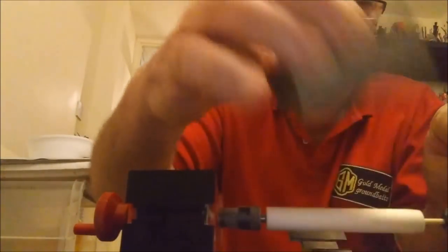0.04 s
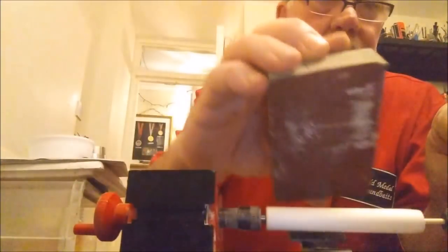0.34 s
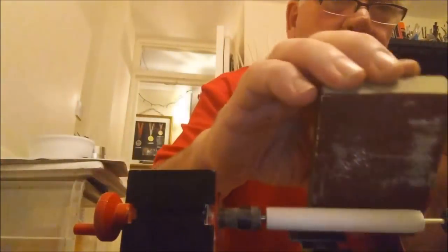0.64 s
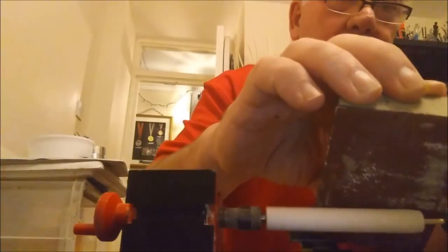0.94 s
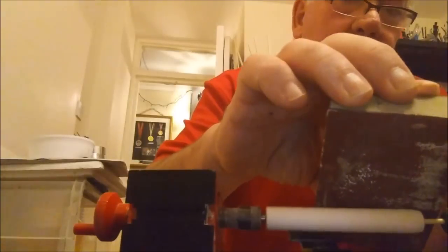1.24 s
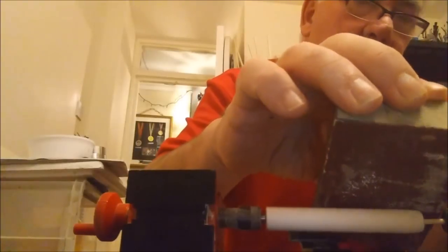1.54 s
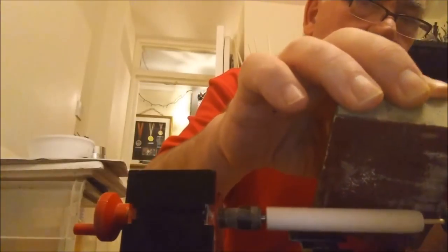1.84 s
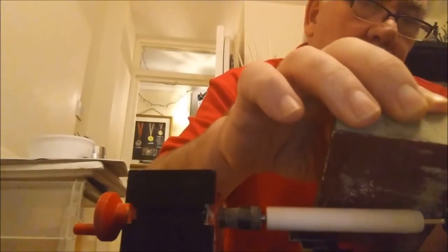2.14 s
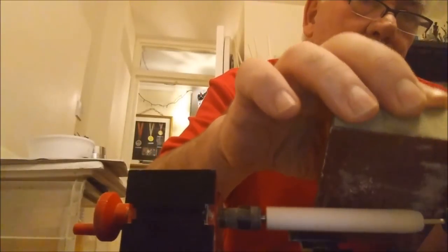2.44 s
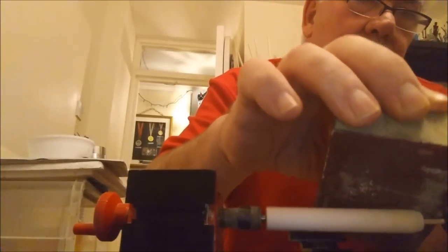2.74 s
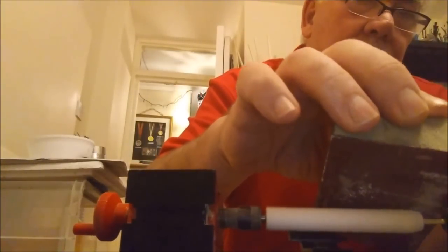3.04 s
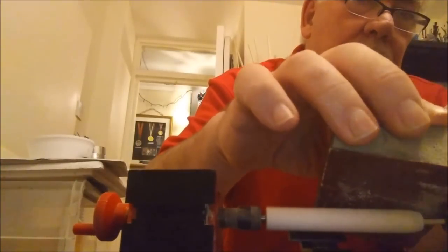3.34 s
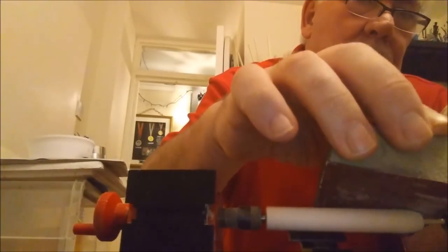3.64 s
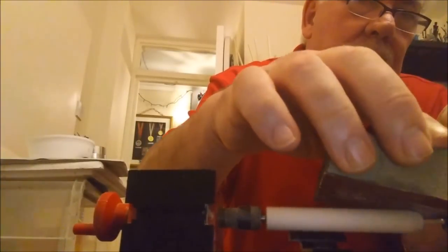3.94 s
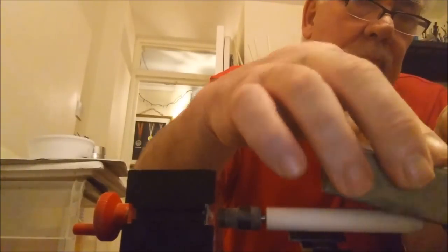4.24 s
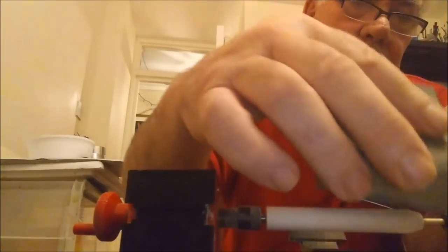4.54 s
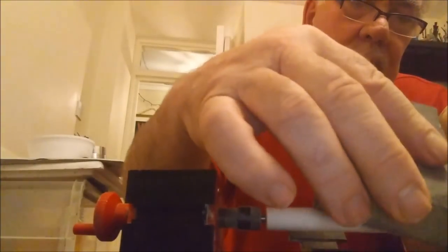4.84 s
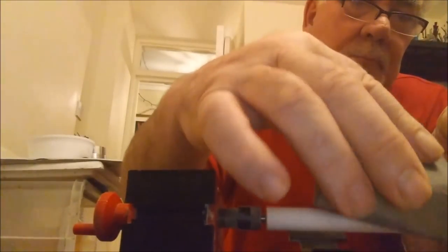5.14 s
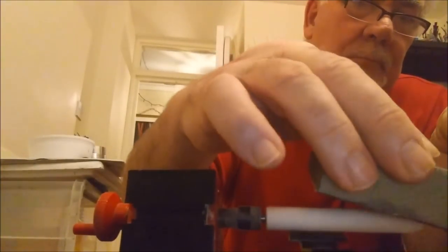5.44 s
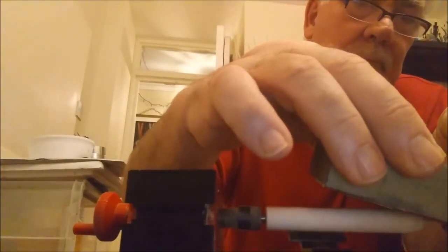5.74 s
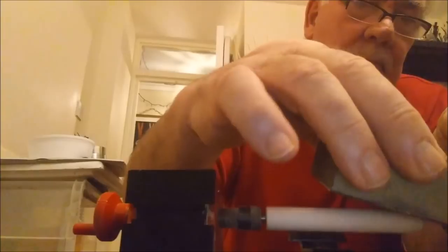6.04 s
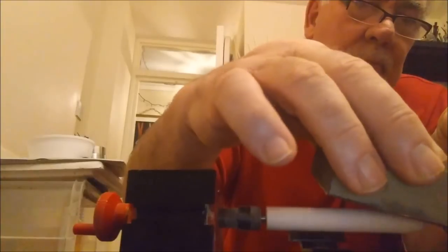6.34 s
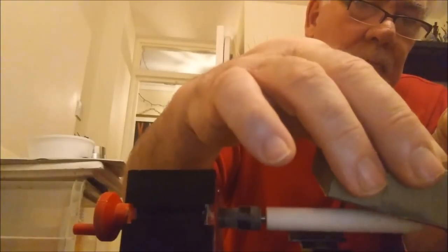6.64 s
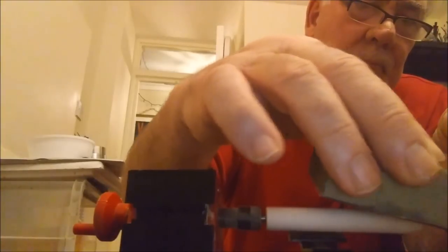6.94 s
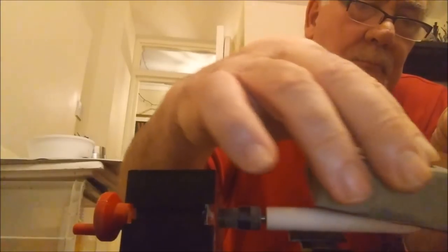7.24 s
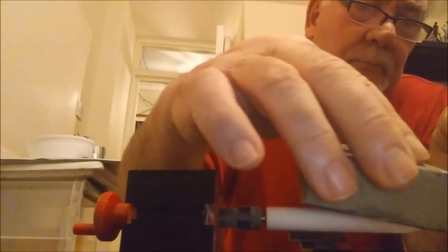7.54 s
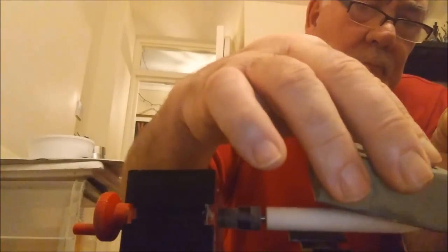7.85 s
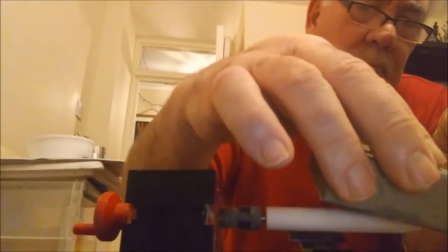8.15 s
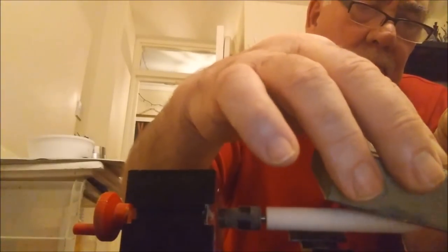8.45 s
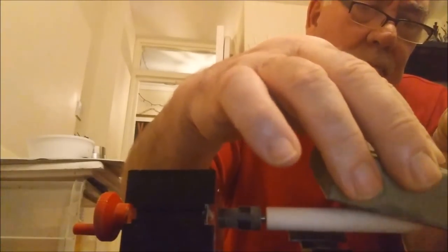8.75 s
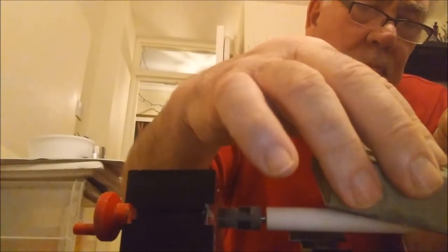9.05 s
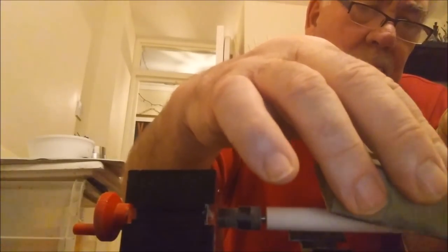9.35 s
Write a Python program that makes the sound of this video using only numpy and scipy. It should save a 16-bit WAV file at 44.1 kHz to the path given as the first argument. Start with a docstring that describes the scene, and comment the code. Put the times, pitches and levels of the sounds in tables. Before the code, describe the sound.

A small electric lathe whines steadily while a sanding block rasps against a spinning wooden rod, then a soft pad hisses more finely.

```python
"""A small electric lathe whines close by, in mono, its motor turning six times for each spindle turn.
At first the balsa rod runs loose and chatters. From about 1 s a sanding block steadies it: the grit
hisses and rasps as the slightly eccentric rod pushes back once a turn, the paper catches now and then,
and the motor sags a little under the load. The block lifts, and from 4.8 s a soft abrasive pad is
rocked against the rod with a finer hiss and a hollow rub. Under both tools the treble dips briefly."""
import sys
import numpy as np
from scipy.fft import rfft, irfft, next_fast_len
from scipy.io import wavfile
from scipy.ndimage import map_coordinates

SR = 44100
rng = np.random.default_rng(int(sys.argv[2]) if len(sys.argv) > 2 else 0)


def int16_out(signal):
    """Quantize to a 16-bit WAV file."""
    q = np.round(np.clip(np.atleast_2d(signal).T, -1, 1) * 32767)
    wavfile.write(sys.argv[1], SR, q.astype(np.int16))


N = 423801
GEARING = 6  # motor turns per spindle turn

# how hard the block is pressed on the rod: (time [s], relative hiss [dB], relative rasp [dB])
BLOCK_PRESS = [(0.94, -28.5, -31), (1.25, -36, -30.5), (1.6, -32, -29), (2.1, -31.9, -27),
               (2.8, -30.5, -27), (3.25, -30.5, -28), (3.8, -31, -30.5), (4.15, -31.5, -32),
               (4.36, -35.5, -39)]
# how hard the pad is pressed: (time [s], relative hiss [dB], relative rub [dB], relative thrum [dB])
PAD_PRESS = [(4.8, -41, -32, -52), (5.05, -36, -27.5, -56), (5.75, -37.3, -33.5, -73),
             (6.15, -35.3, -30.5, -60), (7, -35.3, -32, -56.5), (7.7, -36.5, -31.5, -55),
             (8.3, -36, -32.5, -54.5), (8.85, -34.5, -27.5, -54.5), (9.61, -35.5, -29, -61)]
# hollow colour of a soft surface rubbing the rod: (frequency [Hz], relative level [dB])
RUB_SPECTRUM = [(200, -45), (1000, -25), (1480, 2), (1900, 0), (2600, -10.5), (6000, -52)]


def sanding_block(spindle):
    """Stiff sandpaper scratches hardest as the rod's high side comes round; the hand behind it trembles."""
    # colours of the hiss and the rasp: (frequency [Hz], relative level [dB])
    hiss_spectrum = [(50, -34), (200, -22.5), (700, -17), (1050, -10), (1400, 0), (1900, -8), (3200, -1.5),
                     (4300, -12.5), (5600, 5), (7100, 3.5), (7550, -21), (9100, -8), (10500, -47),
                     (15800, -35)]
    rasp_spectrum = [(40, -48), (200, -22.5), (1000, -11), (1450, -10.5), (1900, -0.5), (2600, -8.5),
                     (3600, 3.5), (4400, -1), (5700, 0.5), (7000, -16), (9000, -29), (12500, -28),
                     (15800, -40)]
    # thrum of the held block: (multiple of the spindle speed, relative level [dB])
    partials = [(2, -4.5), (3, 1.5), (4, -4.5), (5, -34), (10, -21), (11, -4)]
    roll_start_s, roll_takes_s = 2.8, 0.96
    hiss_db, rasp_db = curves(BLOCK_PRESS)
    eased_db = rasp_db - rasp_db.max()
    pressure = amp(1.2 * tone(spindle) + .8 * tone(2 * spindle) + 1.5 * wobble(34.84))
    hiss_gain = amp(hiss_db + 1.6 + wobble(9))
    hiss = hiss_gain * coloured(grit(density=8000, spread_db=14) * pressure, hiss_spectrum)
    # the rasp swells faster than the rest once the grit bites
    bite_db = rasp_db + 0.9 * eased_db + 1.55 * wobble(24.74)
    rasp = amp(bite_db + 3.5) * coloured(grit(density=7000, spread_db=6) * pressure, rasp_spectrum)
    # a hollow rub fades in as the block rolls onto its soft edge
    rolled = np.clip((seconds() - roll_start_s) / roll_takes_s, 0, 1)
    rub = rolled * amp(-34.5 + 2.8 * wobble(11)) * coloured(rng.standard_normal(N) * pressure, RUB_SPECTRUM)
    tremble = amp(1.8 * wobble(10))
    body = amp(-53.5 + 0.45 * eased_db) * tremble * thrum(spindle, partials, unsteady_db=1.5)
    return touching(BLOCK_PRESS, fade_s=.025) * (hiss + rasp + rub + body)


def soft_pad(spindle):
    """The pad wraps the rod: a finer hiss over a hollow rub and a thrum, all swelling with each stroke."""
    # colour of the fine grit: (frequency [Hz], relative level [dB])
    hiss_spectrum = [(100, -21), (900, -21), (2000, -16), (2600, 1), (3300, 6), (4300, 3), (5600, 3),
                     (7150, 2), (7700, -14), (9100, -9), (10500, -37), (12500, -32), (15800, -38)]
    # thrum of the held pad: (multiple of the spindle speed, relative level [dB])
    partials = [(2, -1.5), (3, -19), (4, -8)]
    hiss_db, rub_db, thrum_db = curves(PAD_PRESS)
    push = rocking(lead_s=0) + 0.66 * wobble(6.3)
    pressure = amp(2 * tone(spindle) + .5 * tone(2 * spindle) + .5 * wobble(25))
    hiss_gain = amp(hiss_db + 6.5 + 1.4 * rocking(lead_s=.07) + .6 * wobble(9))
    hiss = hiss_gain * coloured(grit(density=14000, spread_db=6.5) * pressure, hiss_spectrum)
    rub = amp(rub_db - 2 + 1.74 * push) * coloured(rng.standard_normal(N) * pressure, RUB_SPECTRUM)
    tremble = amp(2.2 * wobble(12))
    body = amp(thrum_db - 1 + 1.9 * push) * tremble * thrum(spindle, partials, unsteady_db=1.2)
    return touching(PAD_PRESS, fade_s=0.028) * (hiss + rub + body)


def rocking(lead_s):
    """The hand rocks the pad to and fro: +1 comes lead_s ahead of each push."""
    stroke_hz, first_push_s = 3.6, 5.033
    return np.cos(2 * np.pi * stroke_hz * (seconds() - first_push_s + lead_s))


def paper_catches():
    """Brief stick-slip of the paper: each catch is a swell of narrow noise."""
    # squeaks and bumps: (time [s], pitch [Hz], half width [Hz], level [dB], half length [s])
    catches = [(1.528, 5100, 600, -23.5, 0.025), (1.69, 5870, 160, -24.5, 0.017),
               (1.695, 3700, 1200, -24.5, 0.018), (2.08, 3600, 800, -23, .03), (2.11, 230, 150, -45, 0.022),
               (2.27, 260, 170, -42, 0.03), (2.424, 1470, 300, -30, 0.025), (2.44, 240, 220, -43, .025),
               (2.784, 360, 260, -43, 0.04), (2.789, 1480, 700, -27, 0.044), (3.05, 230, 130, -41, 0.025),
               (3.822, 1520, 400, -30, 0.056), (3.832, 3200, 900, -25, .035)]
    out = np.zeros(N)
    size = SR // 4
    t = (np.arange(size) - size // 2) / SR
    f = np.fft.rfftfreq(size, 1 / SR)
    for time, hz, half_width, db, half_length in catches:
        band = np.exp(-((f - hz) / half_width) ** 2)
        noise = unit(irfft(rfft(rng.standard_normal(size)) * band, size))
        out[round(time * SR) - size // 2:][:size] += amp(db) * noise * np.exp(-(t / half_length) ** 2)
    return out


def motor_whine(spindle, speed):
    """Motor drone and overtones; each tool loads them differently, play in the drive blurs the highs."""
    # motor overtones: (multiple of the motor speed, free [dB], under the block [dB], under the pad [dB])
    overtones = [(2, -44.0, -45.9, -43.5), (3, -41.5, -47.0, -42.6), (4, -44.0, -42.8, -41.7),
                 (5, -41.6, -37.2, -34.6), (6, -49.3, -56.9, -50.7), (7, -40.0, -40.3, -41.1),
                 (8, -37.1, -39.8, -43.6), (9, -38.5, -33.9, -37.1), (10, -40.2, -35.9, -34.8),
                 (11, -35.0, -37.4, -37.0), (12, -34.8, -38.5, -38.0), (13, -30.2, -31.8, -34.0),
                 (14, -36.7, -42.7, -43.7), (15, -37.5, -37.9, -35.2), (16, -43.1, -54.1, -46.6),
                 (17, -43.5, -55.2, -46.9), (18, -35.4, -37.3, -36.4), (21, -50.0, -58.6, -47.8),
                 (30, -50.4, -54.3, -55.2), (31, -55.5, -57.7, -56.3)]
    # strong partials of the drive: (multiple of the spindle speed, relative level [dB])
    drive_partials = [(5, -63.5), (11, -68), (16, -50.5), (21, -57), (28, -44.5), (29, -43.5), (43, -40.5),
                      (49, -43), (59, -39), (61, -59)]
    # mains hum: (frequency [Hz], level [dB])
    hum_partials = [(50, -68), (100, -64)]
    seat_start_s, seat_takes_s = 0.78, 0.5
    drone_db, loose_drop_db, swell_db, swell_hz = -32.9, 6, 3.6, 2.15
    singing_order, housing_hz, half_width_hz = 13, 4046, 6.7
    t = seconds()
    motor = GEARING * spindle + .002 * wobble(45) + .003 * tone(spindle)
    on_block, on_pad = touching(BLOCK_PRESS, fade_s=.1), touching(PAD_PRESS, fade_s=0.049)
    # until the first pressure seats the loose rod, the drone is weaker and swells slowly
    loose = np.clip(1 - (t - seat_start_s) / seat_takes_s, 0, 1)
    swell = np.cos(np.pi * swell_hz * t) ** 10 * (t < seat_start_s)
    out = amp(drone_db - loose_drop_db * loose + swell_db * swell + 0.42 * wobble(25)) * tone(motor)
    # one overtone sings when the speed brings it onto a resonance of the housing
    singing_db = 1 / (1 + ((singing_order * speed - housing_hz) / half_width_hz) ** 2)
    for k, free_db, block_db, pad_db in overtones:
        blur = min(k / 10, 1)
        level = free_db + (block_db - free_db) * on_block + (pad_db - free_db) * on_pad
        level -= loose_drop_db * loose * (k < 4)  # a loose rod passes on less of the lowest overtones
        level += singing_db * (k == singing_order)
        waver = (.8 + 2.2 * on_block * (1 - blur)) * wobble(8)  # the stiff block shakes the low ones
        flutter = blur * 1.2 * wobble(40)
        out += amp(level + waver + flutter) * tone(k * motor + blur * .03 * wobble(50))
    drive = amp(-2) * thrum(spindle, drive_partials, unsteady_db=3)
    hum = sum(amp(db) * tone(hz * t) for hz, db in hum_partials)
    return out + drive + hum


def machine_rattle(spindle):
    """Bearings and brushes: a roughness that partly repeats each turn, rushing and ringing in the housing."""
    # colours of the running rush and the motor's fine top buzz: (frequency [Hz], relative level [dB])
    rush_spectrum = [(30, -42), (120, -23.5), (400, -18), (850, -11.5), (1400, 0), (1800, -4.5), (2300, -3),
                     (2650, 1.5), (3230, -2), (4100, 0), (5500, -8), (6600, -19), (10000, -24.5),
                     (13000, -50)]
    buzz_spectrum = [(4500, -65), (5900, 11), (6800, -3.5), (8300, -5), (9900, -5), (12000, -14.5),
                     (15800, -30)]
    # resonances of the motor housing: (frequency [Hz], width [Hz], relative level [dB])
    housing_modes = [(3015, 100, 0), (3980, 96, 6), (4645, 120, -2), (5484, 89, 2), (9380, 140, -15.5),
                     (14050, 400, -41)]
    # the rattle is what differs between the six motor turns; what they share is heard as the whine
    laps = rng.standard_normal(size=(GEARING, 144))
    repeating = surface(spindle + .0006 * wobble(30), (laps - laps.mean(axis=0)).ravel())
    # the drive throbs with the spindle, the motor and the slower lap of the belt
    throb = 1 + .06 * tone(spindle) + .04 * tone(GEARING * spindle) + .06 * tone(.311 * spindle)
    rush = coloured((rng.standard_normal(N) + .45 * repeating) * throb, rush_spectrum)
    brushes = np.sign(rng.standard_normal(size=144))
    buzz = coloured(surface(GEARING * spindle + 0.0059 * wobble(50), brushes), buzz_spectrum)
    ring = ringing(rng.standard_normal(N) * throb, housing_modes)
    return amp(-24.5) * rush + amp(-33.5) * ring + amp(-48.5) * buzz


def rod_chatter(spindle):
    """The loose rod buzzes and rattles once a turn until the block first steadies it."""
    # buzz of the rod on its centre: (multiple of the spindle speed, level [dB])
    partials = [(4, -63), (8, -57), (13, -49), (14, -51), (15, -50), (16, -51), (19, -49), (21, -45),
                (25, -39.5), (37, -41), (38, -44)]
    # colour of its rattle: (frequency [Hz], relative level [dB])
    rattle_spectrum = [(50, -11), (400, -14), (600, -4), (1000, -9), (1350, 7), (1900, -3), (3000, -33)]
    loose = np.clip((BLOCK_PRESS[0][0] - seconds()) / 0.052, 0, 1)
    knocking = rng.standard_normal(N) * amp(2.5 * tone(spindle) + 1.6 * wobble(29.5))
    buzz = thrum(spindle + 0.0053 * wobble(39.9), partials, unsteady_db=2)
    return loose * (buzz + amp(-38.5) * coloured(knocking, rattle_spectrum))


def treble_dips(x):
    """The treble, and with it the bass and a band near 900 Hz, ducks briefly and comes back."""
    # the dips: (time [s], depth [dB])
    dips = [(1.52, 11.5), (1.69, 14), (1.923, 11), (2.01, 13), (2.065, 9), (2.31, 15), (2.587, 14),
            (2.78, 13), (2.97, 14), (3.74, 12), (3.837, 43), (3.993, 14), (5.38, 12), (5.723, 15),
            (6.94, 13), (7.517, 15)]
    # bands that duck together: (low edge [Hz], high edge [Hz])
    bands = [(0, 200), (720, 1100), (7300, 20000)]
    half_length_s = 0.011
    depth_db = sum(db * np.exp(-((seconds() - time) / half_length_s) ** 2) for time, db in dips)
    in_bands = filtered(x, lambda hz: sum((hz > low) & (hz < high) for low, high in bands))
    return x - in_bands * (1 - amp(-depth_db))


def grit(density, spread_db):
    """Sparse scratches of uneven size, density a second."""
    hits = rng.random(N) < density / SR
    return unit(hits * np.sign(rng.standard_normal(N)) * amp(spread_db * rng.uniform(-0.82, 1, N)))


def thrum(spindle, partials, unsteady_db):
    """Wavering partials of a part that is shoved once on each turn of the spindle."""
    return sum(amp(db + unsteady_db * wobble(14)) * tone(k * spindle) for k, db in partials)


def surface(turns, track):
    """The roughness of a running surface, repeated on every turn."""
    return unit(map_coordinates(track, [turns % 1 * len(track)], order=3, mode="grid-wrap"))


def touching(rows, fade_s):
    """1 while a tool is on the rod, 0 while it is lifted."""
    t = seconds()
    return np.clip(1 + np.minimum(t - rows[0][0], rows[-1][0] - t) / fade_s, 0, 1)


def tone(turns):
    """A sine of rms 1 that starts at a random phase."""
    return np.sqrt(2) * np.sin(2 * np.pi * (turns + rng.random()))


def wobble(rate):
    """A smooth random curve, rate knots a second."""
    knots = rng.standard_normal(int(N * rate / SR) + 4)
    coarse = np.arange(0, N, 32)
    return np.interp(np.arange(N), coarse, map_coordinates(knots, [coarse * rate / SR]))


def ringing(x, modes):
    """x through a bank of resonances, at rms 1."""
    def response(f):
        return sum(amp(db) * 1j * f * width / (hz * hz - f * f + 1j * f * width) for hz, width, db in modes)
    return unit(filtered(x, response))


def coloured(x, spectrum):
    """x through an EQ curve, at rms 1."""
    f, db = np.transpose(spectrum)
    return unit(filtered(x, lambda hz: amp(np.interp(np.log(hz + 1), np.log(f), db))))


def filtered(x, response):
    """x with its spectrum multiplied by response(frequency)."""
    size = next_fast_len(N + SR // 2)
    return irfft(rfft(x, size) * response(np.fft.rfftfreq(size, 1 / SR)), size)[:N]


def curves(rows):
    """An envelope for each column after the time."""
    times, *columns = np.transpose(rows)
    return [np.interp(seconds(), times, column) for column in columns]


def seconds():
    """The time of each sample."""
    return np.arange(N) / SR


def amp(db):
    """Decibels to gain."""
    return 10 ** (np.asarray(db) / 20)


def unit(x):
    """Scale to rms 1."""
    return x / np.sqrt(np.mean(x ** 2) + 1e-20)


def scene():
    """The turning spindle sets the pulse for the lathe and both tools."""
    # the motor's pace: (time [s], speed [turns/s])
    motor_speed = [(0.0, 306.7), (0.13, 310.9), (0.4, 308.4), (0.8, 311.1), (1.12, 307.1), (1.58, 307.4),
                   (1.71, 304.9), (2.01, 306.6), (2.09, 302.7), (3.05, 305.8), (3.4, 303.6), (3.69, 306.4),
                   (3.96, 304.3), (4.52, 309.6), (4.98, 307.4), (7.25, 306.0), (9.31, 306.1), (9.61, 307.3)]
    # the unsteady hand makes the speed waver while a tool is on the rod
    loaded = touching(BLOCK_PRESS, fade_s=.1) + touching(PAD_PRESS, fade_s=.1)
    speed = curves(motor_speed)[0] + .45 * loaded * wobble(8)
    spindle = np.cumsum(speed) / SR / GEARING  # angle in turns
    lathe = motor_whine(spindle, speed) + machine_rattle(spindle) + rod_chatter(spindle)
    sanding = sanding_block(spindle) + paper_catches() + soft_pad(spindle)
    mono = treble_dips(lathe + sanding)
    return np.array([mono, mono])


def record(dry):
    """A brick-wall low-pass takes off the very top."""
    top_hz = 15800
    return np.array([filtered(channel, lambda hz: hz < top_hz) for channel in dry])


dry = scene()
out = record(dry)
int16_out(out)
```